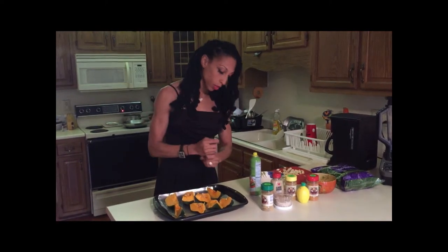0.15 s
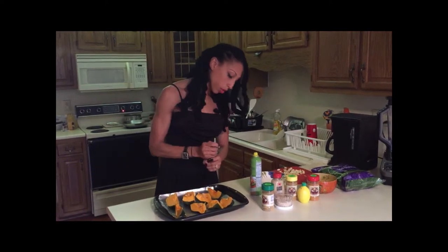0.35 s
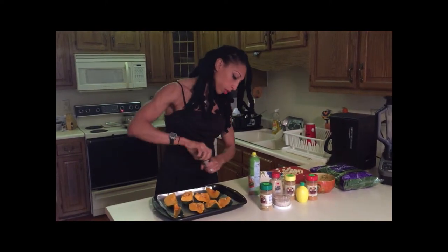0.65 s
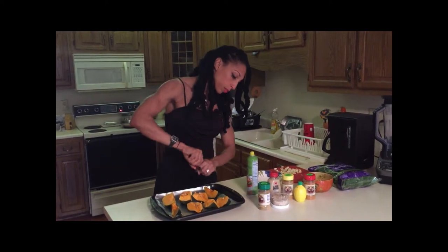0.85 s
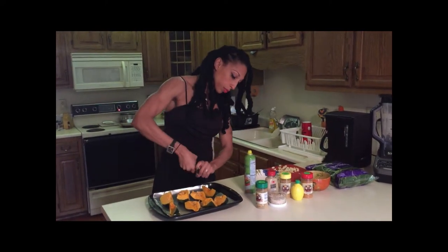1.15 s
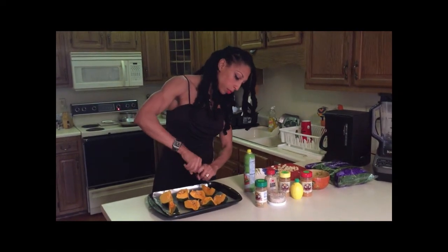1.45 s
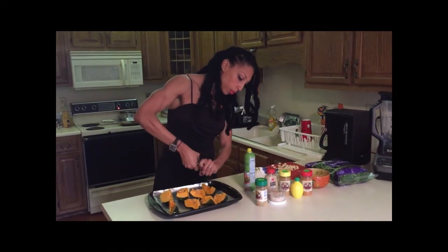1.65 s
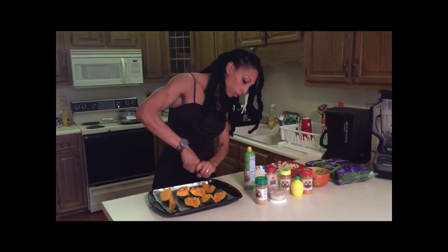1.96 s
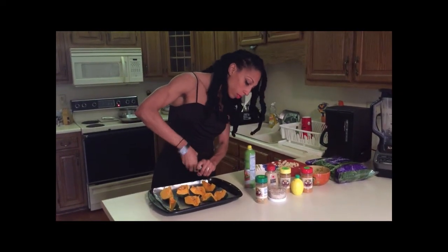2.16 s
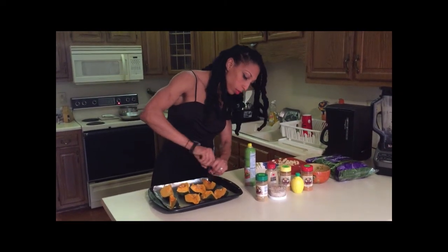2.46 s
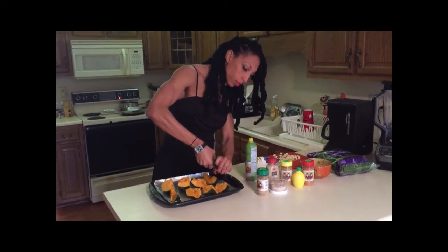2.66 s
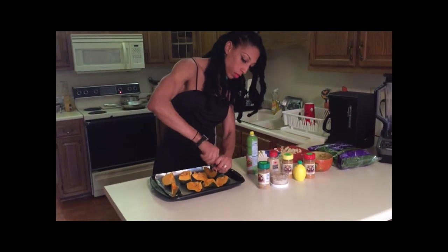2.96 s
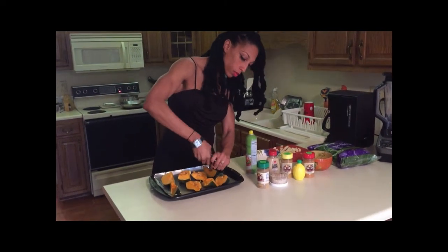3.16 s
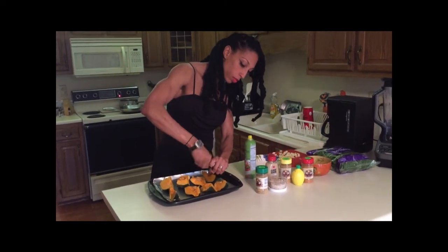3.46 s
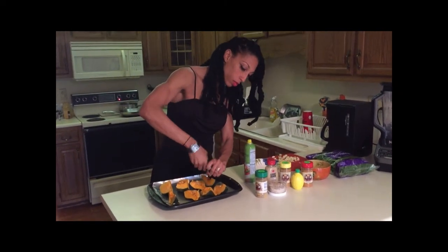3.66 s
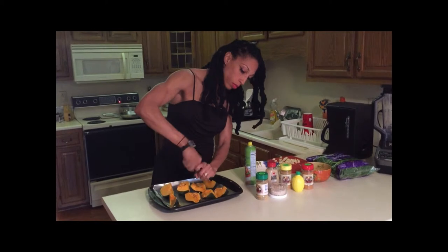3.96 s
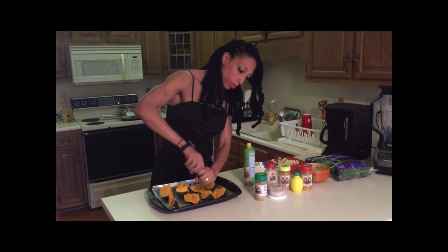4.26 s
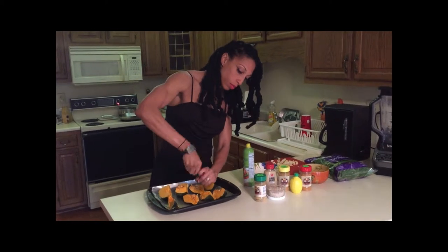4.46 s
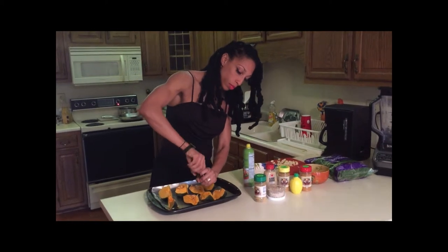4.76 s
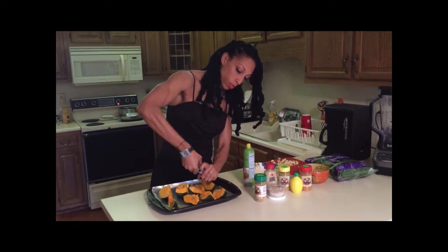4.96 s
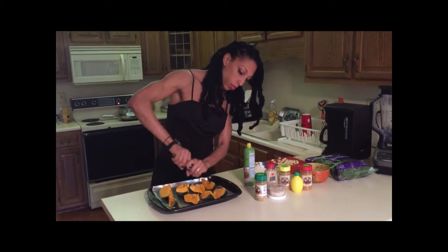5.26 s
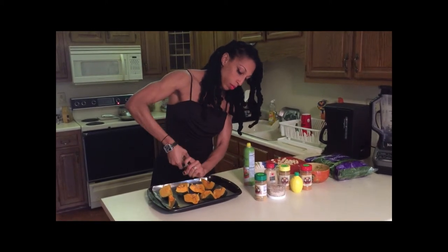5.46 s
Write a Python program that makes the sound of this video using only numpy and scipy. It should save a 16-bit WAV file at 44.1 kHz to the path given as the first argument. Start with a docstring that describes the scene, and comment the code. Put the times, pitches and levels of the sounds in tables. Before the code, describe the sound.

Faint air noise and a low appliance hum run throughout in a home kitchen. At about 0.3 seconds a hand pepper grinder gives a first, softer crunch. From 1.1 seconds it is twisted steadily, about twice a second: at 1.7, 2.1, 2.6, 3.1, 3.6, 4.1, 4.6, 5.0 and 5.5 seconds. Each twist lasts a tenth to a fifth of a second, a dry, gritty crunch with a few sharp cracks of peppercorns and a slight trickle of crumbs after it. The strongest come between 1 and 3.7 seconds; the last ones are a little quieter. Thin, light ticks sound between turns. Soft, low bumps of a body shifting come at 2.3 seconds, around 4.8 and at 5.3. The microphone is about two metres away, and hard cupboards add a short, bright echo.

```python
"""Faint air and appliance hum in a kitchen, then the crunch of a hand pepper mill, twisted eleven times
over a baking tray two metres from the microphone. In each twist peppercorns crack between the burrs and
their fragments crumble; every fracture rings the mill, and hard cupboards answer short and bright.
Between twists the mill ticks lightly, and a few soft bumps come from a body shifting its weight."""
import sys
import numpy as np
from scipy import signal
from scipy.fft import rfft, irfft
from scipy.io import wavfile

SR = 44100
rng = np.random.default_rng(int(sys.argv[2]) if len(sys.argv) > 2 else 0)


def unload_wav(signal):
    """Save mono or channel-first audio to the path in sys.argv[1] as 16-bit WAV at rate SR, clipped to [-1, 1]."""
    wavfile.write(
        sys.argv[1],
        SR,
        np.round(np.clip(np.atleast_2d(signal).T, -1, 1) * 32767).astype(np.int16),
    )


N = 246911


def undb(db):
    """Decibels to gain."""
    return 10 ** (np.asarray(db) / 20)


def unit(x):
    """Scale to an energy of one."""
    return x / np.sqrt(np.sum(x ** 2) + 1e-30)


def lookup(points, hz):
    """Read a table of (Hz, value) on a log-frequency axis."""
    table_hz, value = np.transpose(points)
    return np.interp(np.log(np.maximum(hz, 1)), np.log(table_hz), value)


def add(out, start_s, sound):
    """Mix a sound in at its start time."""
    i = max(int(start_s * SR), 0)
    out[i:i + len(sound)] += sound[:max(N - i, 0)]


# The kitchen's air at the microphone. Each row: frequency in Hz, relative spectral density in dB.
AIR_SPECTRUM = [(20, -40), (42, -10.5), (65, -7.5), (180, -6.5), (330, -9.5), (460, -15), (950, -20),
                (1110, -13.5), (1300, -19.5), (1700, -26), (2800, -28), (5000, -32.5), (15500, -39)]
# The appliances in the room. Each row: frequency in Hz, rms level in dB.
HUM_TONES = [(53.8, -78), (156.1, -75.5), (240, -72.5), (360, -80)]

def room_tone(air_db=-66, waver=0.13, knots=18):
    """Steady air noise and the slightly wavering hum of kitchen appliances."""
    t = np.arange(N) / SR
    noise = rfft(rng.standard_normal(N))
    colour = undb(lookup(AIR_SPECTRUM, np.arange(len(noise)) * SR / N))
    air = unit(irfft(noise * colour, N)) * np.sqrt(N)
    knot_s = np.linspace(0, t[-1], knots)
    hum = 0
    for hz, db in HUM_TONES:
        swell, drift = (np.interp(t, knot_s, row) for row in rng.standard_normal((2, knots)))
        hum += np.sqrt(2) * undb(db) * (1 + waver * swell) * np.sin(2 * np.pi * hz * t + drift / 2)
    return undb(air_db) * air + hum


# Twists of the wrist over the tray, about two a second. Each row: start and length in seconds,
# burr level in dB, barrel and snap in dB relative to the burr, drop to the trickle in dB.
WRIST_TWISTS = [(0.292, 0.094, -67, 6, -3, -30), (1.073, 0.18, -51, 2, -3, -17),
                (1.655, 0.1, -53, -0.5, -2, -27), (2.084, 0.115, -52, 3, -2.5, -25),
                (2.643, 0.11, -51, 1.5, 1, -5), (3.121, 0.086, -53.5, 2, -3, -21),
                (3.586, 0.11, -54.5, 6, -11, -18), (4.12, 0.08, -53, 4.5, -4.5, -31),
                (4.582, 0.14, -55.5, 4, 1.5, -22), (5.04, 0.1, -55, 2, -0.5, -21),
                (5.48, 0.13, -57, 0, 0, -19)]

def crumbling(grains_per_s=620, spread_db=2, tear_s=0.0003, size=18432, grains=400):
    """Fragments crumble one after another at uneven gaps: many tiny grains, a few big ones."""
    start_s, length_s, burr_db, barrel_db, snap_db, trickle_db = np.transpose(WRIST_TWISTS)
    pushes = np.zeros((len(start_s), size))
    for push, span, trickle in zip(pushes, length_s, trickle_db):
        gaps, strength = rng.exponential(size=(2, grains))
        grain_s = np.cumsum(gaps) / grains_per_s
        force = undb(spread_db * np.minimum(strength, 3.5)) * pressure(grain_s, span, trickle)
        inside = grain_s * SR < size
        push[(grain_s[inside] * SR).astype(int)] = force[inside]
    # each grain takes a moment to tear
    pushes = signal.lfilter([1], [1, -np.exp(-1 / (tear_s * SR))], pushes + 1e-18)
    out = np.zeros(N)
    for start, span, db, sound in zip(start_s, length_s, burr_db, mill(pushes, barrel_db, snap_db)):
        add(out, start, sound * undb(db) * np.sqrt(span * SR))
    return out


def pressure(t, length_s, trickle_db, bite_s=0.009, ease_db_per_s=26, trickle_s=0.13):
    """The burrs bite, the force eases as the corns give way, and loose grit trickles out afterwards."""
    hold = (1 - np.exp(-t / bite_s)) * undb(-ease_db_per_s * t)
    trickle = undb(trickle_db) * np.exp(-np.maximum(t - length_s, 0) / trickle_s)
    return hold * np.where(t < length_s, 1, trickle)


# The mill's resonances, part by part. Each row: centre in Hz, width in Hz, relative level in dB.
BURR_MODES = [(3226, 660, -1.6), (3860, 1100, 0.57)]
BARREL_MODES = [(570, 570, -24.5), (1160, 560, -12.5), (1764, 340, -6), (1931, 220, 0), (2182, 230, -4.5),
                (2515, 480, -1)]
SNAP_MODES = [(6360, 1840, 0.13), (8930, 2440, -0.82), (13270, 3900, -0.28)]

def mill(pushes, barrel_db, snap_db, colour=1):
    """The burrs ring, the hollow barrel answers lower, the husk snaps on top."""
    barrel = undb(barrel_db)[:, None] * ring(pushes, BARREL_MODES, colour)
    snap = undb(snap_db)[:, None] * ring(pushes, SNAP_MODES, colour)
    return ring(pushes, BURR_MODES, colour) + barrel + snap


def ring(pushes, modes, colour, scatter_db=3.0, grip_detune=0.032):
    """Rows of pushes ring one part of the mill; each row has its own mix of modes and an energy of one."""
    hz = np.arange(pushes.shape[1] // 2 + 1) * SR / pushes.shape[1]
    spectra = 0
    for centre_hz, width_hz, db in modes:
        # every fracture happens at another spot on the burr, so it feeds each mode differently
        share = undb(scatter_db * rng.standard_normal(pushes.shape)) * rng.choice([-1, 1], pushes.shape)
        # each new grip and filling shifts the modes a little
        shift = 1 + grip_detune * rng.standard_normal((len(pushes), 1))
        mode = rfft(pushes * share) * resonance(hz, centre_hz * shift, width_hz)
        spectra += undb(db) * mode / np.linalg.norm(mode, axis=1, keepdims=True)
    return np.array([unit(row) for row in irfft(spectra * colour)])


def resonance(hz, centre_hz, width_hz):
    """Complex response of a ringing band with steep skirts."""
    offset = 1j * (hz ** 2 - centre_hz ** 2) / (np.maximum(hz, 1) * width_hz)
    return 1 / (1 + np.sqrt(2) * offset + offset ** 2)


# Peppercorns breaking, a few to a twist. Each row: start in seconds, burr level all round in dB,
# barrel and snap in dB relative to the burr, pitch of the piece in Hz.
CORN_CRACKS = [(0.2938, -56.5, -2, 2, 6460), (0.3193, -40.5, -2, -9, 3330), (0.3302, -41, -4, -3, 3100),
               (0.334, -40, 0, 3, 1820), (1.075, -47, -6, 9.5, 12700), (1.0814, -28.5, -6.5, -0.5, 3680),
               (1.0998, -29.5, -17, -1.5, 3500), (1.159, -33.5, 3.5, 1, 1200), (1.1825, -28, 0, -1, 3400),
               (1.6559, -30.5, -9.5, -10, 4260), (1.6612, -28, 4, 4.5, 990), (1.665, -40, 13.5, -1, 1700),
               (2.0821, -46, 5.5, 5, 6860), (2.0966, -40, -11, -5.5, 3400), (2.11, -38.5, -1, -1, 3570),
               (2.121, -33, -3, -1, 3720), (2.1756, -38, -2, 2.5, 3450), (2.648, -28, -2.5, -2.5, 3950),
               (2.661, -37.5, 0, 2, 4300), (2.7174, -22, -18, -5, 4200), (2.7409, -34, 5.5, 1, 3960),
               (3.1094, -54.5, -6, -9, 3500), (3.1225, -42, -4.5, 1, 6200), (3.162, -31, 2, -0.5, 2330),
               (3.1982, -36, 2, -2, 4300), (3.5906, -44, -7, -3.5, 3670), (3.6208, -35, -1, -7, 3400),
               (3.651, -27, 3.5, 0.5, 1940), (4.1446, -33, -2.5, 2, 13400), (4.167, -33.5, 2.5, 2.5, 6980),
               (4.1875, -44.5, 12.5, 9, 2300), (4.2188, -45, -14, 11.5, 6900), (4.6133, -36, 0, 4, 6200),
               (4.6794, -44.5, 7, 7.5, 6500), (5.0481, -41.5, 4.5, -7, 2040), (5.0516, -38.5, 5, 4.5, 2150),
               (5.134, -36, 0.5, 4, 9040), (5.4875, -48, -7, 2.5, 4000), (5.5088, -36.5, -2, 0.5, 6800),
               (5.584, -41, -11, -3, 3480)]

def cracks():
    """Whole peppercorns give way between the burrs."""
    return fractures(CORN_CRACKS, splinter_gain=0.66, splinter_s=0.002)


def fractures(rows, splinter_gain, splinter_s, tear_s=0.00026, size=2048, splinters=10):
    """Each piece tears, then splinters; returns the sound all round and out of the mill's mouth."""
    start_s, burr_db, barrel_db, snap_db, piece_hz = np.transpose(rows)
    tear = np.arange(size) / SR / tear_s
    pushes = np.tile(tear * np.exp(1 - tear), (len(start_s), 1))
    for push in pushes:
        lags = np.minimum(rng.exponential(splinter_s, splinters) * SR, size // 2).astype(int)
        push[lags] += splinter_gain * rng.exponential(size=splinters)
    # the size of the breaking piece favours one pitch, in a band a quarter of that pitch wide
    hz = np.arange(size // 2 + 1) * SR / size
    colour = 1 + 0.9 / (1 + 2j * (hz / piece_hz[:, None] - 1) / 0.25)
    gain = undb(burr_db) * np.sqrt(SR / 1000)  # the energy of one millisecond at that level
    sounds = mill(pushes, barrel_db, snap_db, colour) * gain[:, None]
    # a corn that breaks near the mouth rings the barrel less and beams more sound out
    beam_db = 2.5 - 0.27 * barrel_db
    around, ahead = np.zeros((2, N))
    for start, beam, sound in zip(start_s, undb(beam_db), sounds):
        add(around, start, sound)
        add(ahead, start, sound * beam)
    return np.array([around, ahead])


# The kitchen's reverberation. Each row: frequency in Hz, time to fall 60 dB in seconds.
KITCHEN_DECAY = [(300, 0.07), (1850, 0.354), (5000, 0.3677), (13000, 0.3056)]
# Its strength two metres from the mill. Each row: frequency in Hz, dB relative to the dry sound.
KITCHEN_LEVEL = [(300, 1.5), (2000, 4.1), (4000, 4.1), (7000, 5.1), (13000, 2.3)]

def echoes(first_s=0.00088, build_s=0.00033):
    """One spot's dense tail from the counter top, cupboards and walls; the bass dies soonest."""
    t = np.arange(int(0.6 * SR)) / SR
    noise = rfft(rng.standard_normal(len(t)))
    octave = np.log2(np.clip(np.arange(len(noise)) * SR / len(t), 250, 16000))
    onset = 1 - np.exp(-np.maximum(t - first_s, 0) / build_s)
    response = np.zeros(len(t))
    for hz in 250 * 2 ** np.arange(7):
        band = irfft(noise * np.maximum(1 - abs(octave - np.log2(hz)), 0), len(t))
        decay = np.exp(-np.log(1000) * t / lookup(KITCHEN_DECAY, hz))
        response += band * unit(onset * decay) * undb(lookup(KITCHEN_LEVEL, hz))
    return response


def kitchen(sound, spots=5, spot_s=0.04):
    """The mill moves in the hands, so its sound passes from one spot's echoes to the next."""
    place = np.arange(N) / SR / spot_s
    out = np.zeros(N)
    for spot in range(spots):
        nearness = np.maximum(1 - abs((place - spot) % spots - 1), 0)
        out += signal.fftconvolve(sound * np.sqrt(nearness), echoes())[:N]
    return out


# Light ticks as the hand lets go and grips again. Each row: start in seconds, burr level all round in dB.
REGRIP_TICKS = [(1.399, -66), (1.471, -70.5), (1.631, -68), (1.876, -68), (1.995, -61.5), (2.417, -68),
                (2.434, -65.5), (2.476, -72), (4.824, -70), (5.277, -70.5), (5.44, -72.5)]

def ticks(barrel_db=-12, snap_db=13, piece_hz=6000):
    """Between twists a crumb caught in the burrs snaps, thin and bright."""
    rows = [(start_s, burr_db, barrel_db, snap_db, piece_hz) for start_s, burr_db in REGRIP_TICKS]
    return fractures(rows, splinter_gain=1.6, splinter_s=0.0042)


# Low bumps at the microphone. Each row: centre in seconds, envelope peak in dB, pitch in Hz.
BODY_BUMPS = [(2.305, -53, 79.2), (4.7, -54, 71.4), (4.836, -53.5, 118), (4.86, -58, 65),
              (5.304, -48.5, 60)]

def bumps(width_s=0.008):
    """A body shifts its weight; each bump is a few soft, low cycles."""
    out = np.zeros(N)
    for centre_s, db, hz in BODY_BUMPS:
        t = np.arange(N) / SR - centre_s
        envelope = np.exp(-(t / width_s) ** 2 / 2)
        out += undb(db) * envelope * np.sin(2 * np.pi * hz * t)
    return out


def scene():
    """One microphone, two metres off: the mill directly and through the kitchen, bumps and room tone."""
    around, ahead = cracks() + ticks()
    grit = crumbling()
    return (ahead + grit + kitchen(around + grit) + bumps() + room_tone())[None]


def record(dry, top_hz=15400):
    """The microphone's chain cuts the top of the treble steeply."""
    lowpass = signal.ellip(8, 0.2, 70, top_hz, fs=SR, output="sos")
    return signal.sosfilt(lowpass, dry)


dry = scene()
out = record(dry)
unload_wav(out)
```